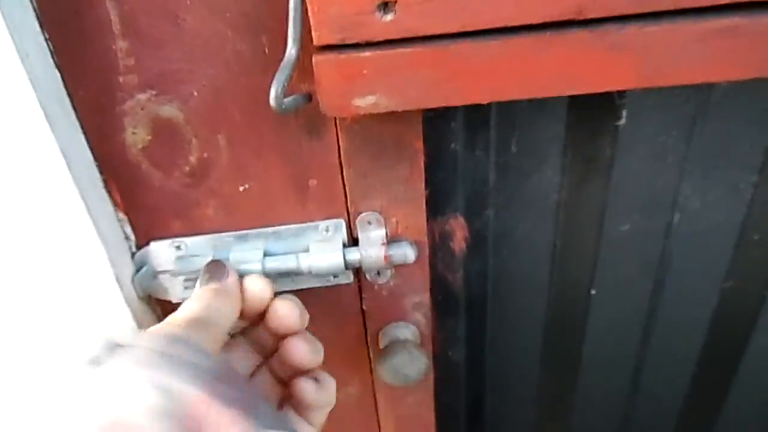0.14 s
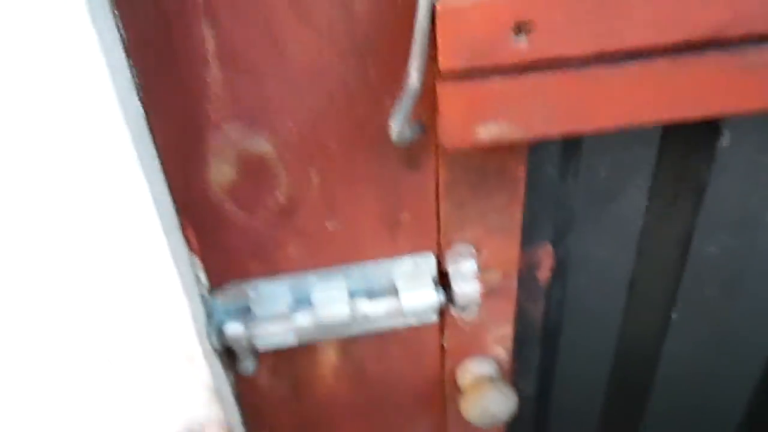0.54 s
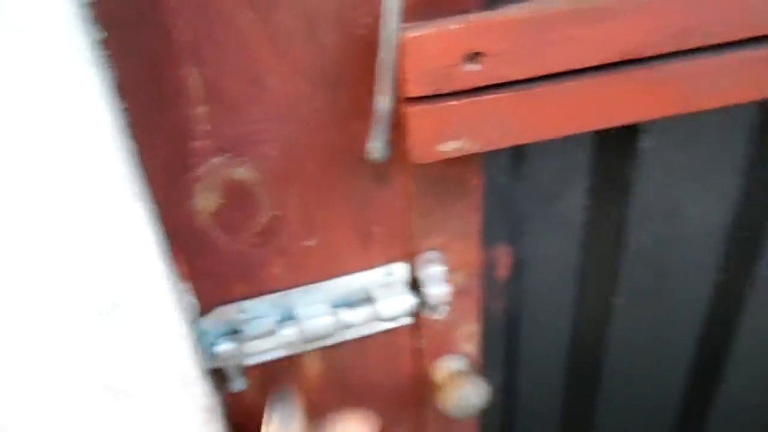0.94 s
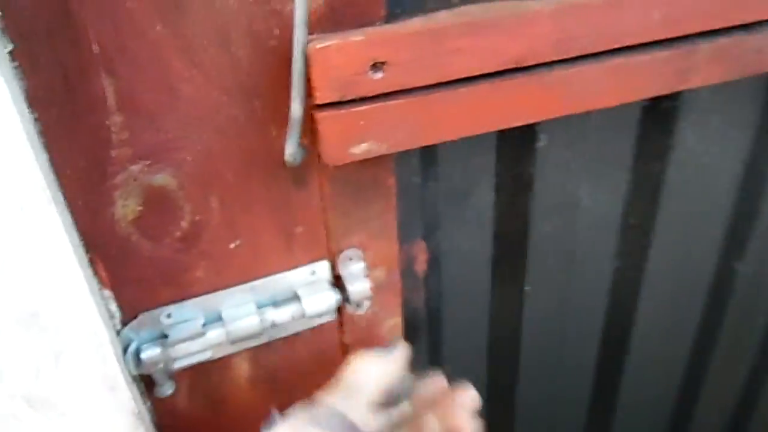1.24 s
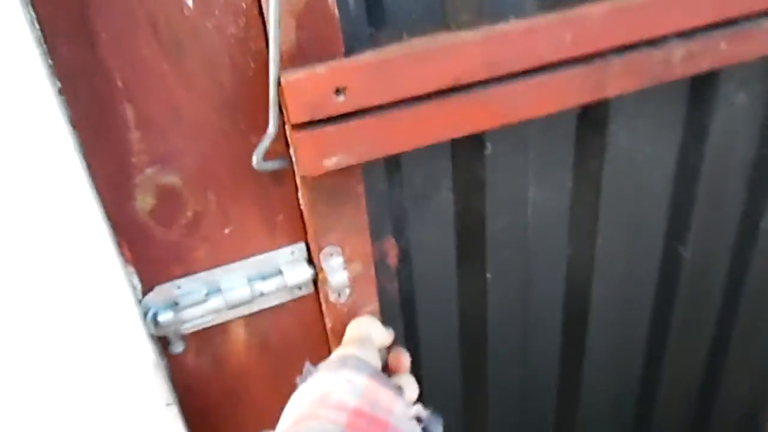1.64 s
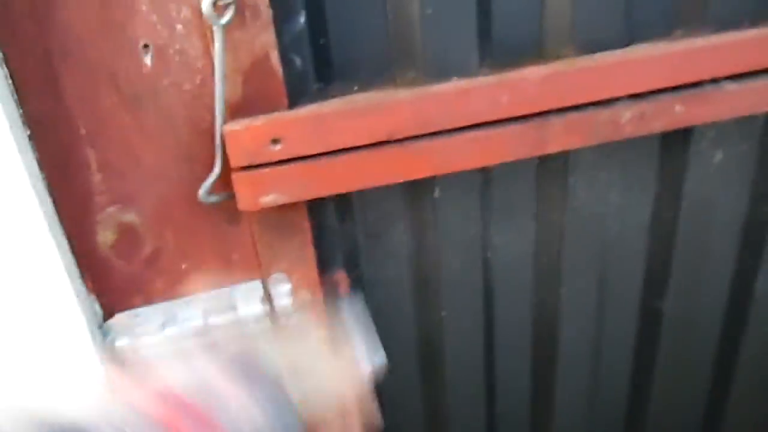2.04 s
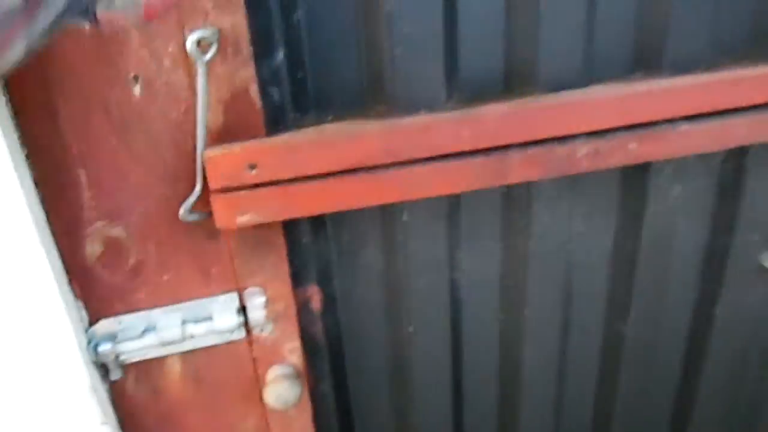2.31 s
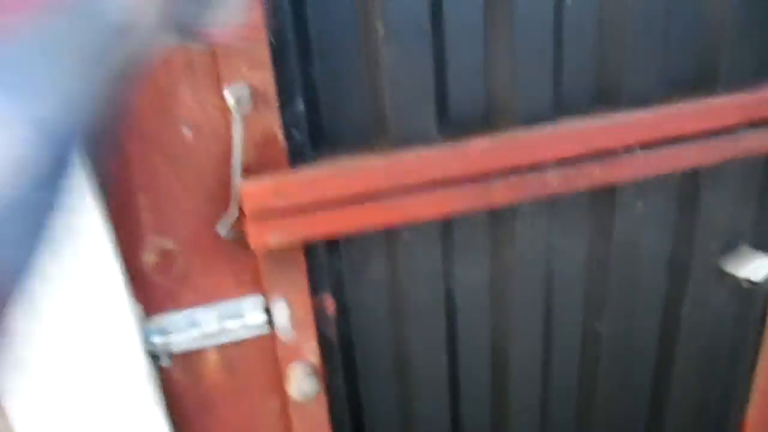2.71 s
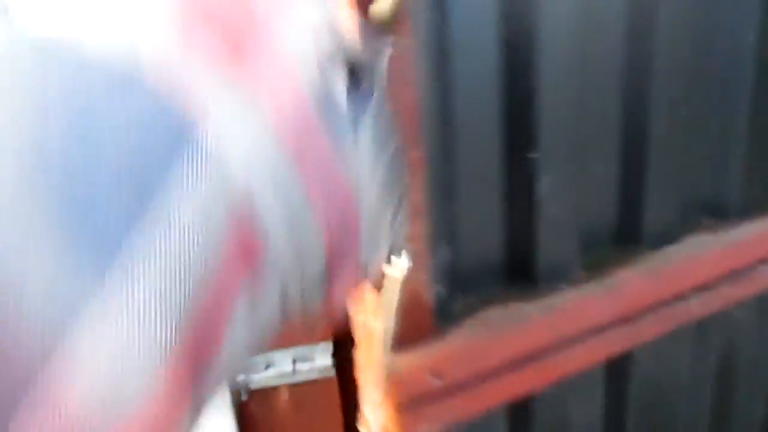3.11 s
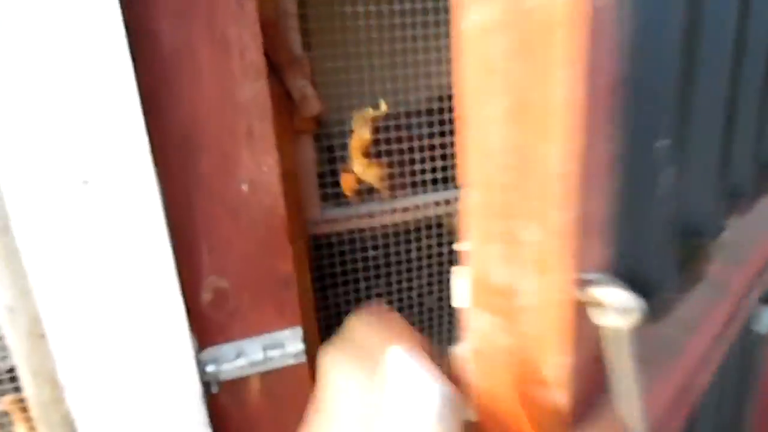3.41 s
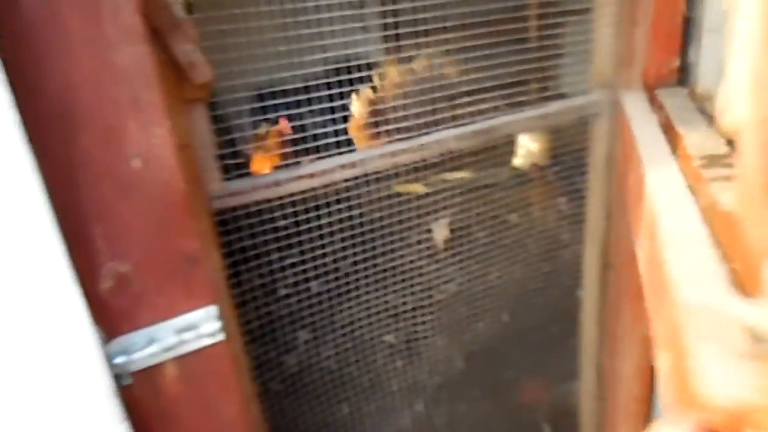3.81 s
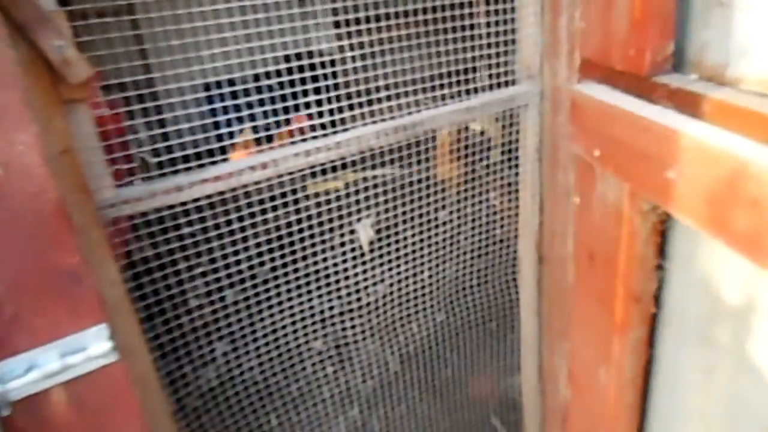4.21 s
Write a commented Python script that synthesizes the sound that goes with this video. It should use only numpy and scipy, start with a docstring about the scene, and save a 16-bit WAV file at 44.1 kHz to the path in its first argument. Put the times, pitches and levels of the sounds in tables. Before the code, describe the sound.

Close outdoor handling: bolt snaps back, sleeve rustles, then a heavy wooden door bangs loose, rattling its hook and sheet metal, knocking as it swings.

```python
"""Outdoor air and handling rumble, filtered noise in slow lumps, lie under a hand-held microphone throughout.
First a steel barrel bolt scrapes back on a wooden coop door, as resonated slip noise, then hits its stop
and its handle drops, as noise bursts through resonances. Sleeve strokes brush past, as grainy noise with snaps.
The stuck door is tugged free with a thump and shudders, as ringing modes; a wire hook rattles and a metal sheet
jangles on it. It knocks lightly as it swings open, while a sliding band of noise whooshes by."""
import sys
import numpy as np
from scipy import signal
from scipy.fft import rfft, irfft
from scipy.io import wavfile
from scipy.ndimage import uniform_filter1d

SR = 44100
rng = np.random.default_rng(int(sys.argv[2]) if len(sys.argv) > 2 else 0)


def master_out(mix):
    """Clip the mix to full scale and print it as 16-bit PCM to the path in sys.argv[1]."""
    frames = np.transpose(np.atleast_2d(mix))
    ceiling = np.clip(frames, -1, 1)
    pcm = np.round(ceiling * 32767).astype(np.int16)
    wavfile.write(sys.argv[1], SR, pcm)


N = 191834
TIME = np.arange(N) / SR  # seconds

# spectrum of the quiet outdoor air: pitch_hz, relative level_db per Hz
AIR_SPECTRUM = [(30, -9.5), (100, -2), (200, -18.5), (350, -11), (850, -24.5), (1180, -11.5), (1600, -32.5),
                (5000, -36.5), (15000, -35.5)]
AIR_DB = -76.5  # rms level
# steady level of the air moving on the microphone, before a small trim: time_s, level_db
DRAUGHT_CURVE = [(0.0, -64.5), (0.67, -57), (1.04, -65.5), (2.13, -44.5), (2.62, -55.5), (2.91, -55),
                 (3.06, -27), (3.12, -28), (3.5, -40.5), (3.73, -38.5), (4.06, -36.5), (4.35, -37.5)]
# single puffs of air as the hands move: peak_s, level_db, release_s
AIR_PUFFS = [(0.0, -46.5, 0.28), (0.5, -30.5, 0.044), (1.17, -48.5, 0.059), (1.36, -41, 0.15),
             (1.57, -44, 0.045), (1.71, -39.5, 0.19), (2.0, -29.5, 0.095), (2.19, -33.5, 0.08),
             (2.31, -28.5, 0.039), (2.925, -17, .07), (3.05, -12.5, 0.067), (3.18, -19.5, 0.15),
             (3.43, -28, 0.041), (3.49, -27, 0.057), (3.84, -34.5, 0.11), (4.09, -21, .06),
             (4.17, -24, .12), (4.32, -29, .06)]
# spectrum of air pushing on the microphone: pitch_hz, relative level_db per Hz
BUFFET_SPECTRUM = [(20, -13), (38, -6.5), (52, 0), (75, -8.5), (110, -15), (170, -28)]
# dull bumps as the grip on the microphone shifts: peak_s, level_db, release_s
GRIP_BUMPS = [(0.0, -40.5, .11), (0.46, -40, 0.14), (1.705, -40, 0.093), (1.47, -57, 0.14), (2.0, -47, .22),
              (2.17, -44, 0.084), (3.035, -23.5, 0.2), (3.43, -38.5, 0.17), (3.91, -42.5, 0.1),
              (4.15, -35.5, 0.25)]
# spectrum of the shifting grip: pitch_hz, relative level_db per Hz
GRIP_SPECTRUM = [(70, -34), (120, 2.5), (200, -10), (330, -7), (480, -21), (700, -16)]
# whoosh rising and falling in pitch on the microphone: time_s, centre_hz, level_db
WHOOSH_CURVE = [(3.98, 98.4, -90), (4.03, 130, -40.5), (4.055, 185.3, -35), (4.085, 330, -53.5),
                (4.12, 270.5, -36), (4.16, 178, -38.5), (4.2, 170, -47), (4.25, 198, -53),
                (4.3, 198.3, -88)]

# steady rubbing of cloth and door edge: time_s, level_db
RUBBING_CURVE = [(0, -74.5), (.36, -74.5), (.6, -59.5), (.8, -74), (1.2, -80.5), (1.45, -72), (1.85, -74),
                 (2.12, -52), (2.8, -58.5), (3.03, -35.5), (3.38, -49.5), (3.72, -42.5), (3.86, -54),
                 (4.35, -50)]
# single scuffs of hand and sleeve: peak_s, level_db, release_s
SCUFF_GESTURES = [(0.0, -51, 0.089), (0.54, -57, 0.081), (0.68, -54.5, 0.078), (1.32, -66, 0.12),
                  (1.455, -58, 0.064), (1.94, -43.5, 0.057), (2.915, -35, 0.11), (3.65, -45, 0.26)]
# spectrum of the rubbing: pitch_hz, relative level_db per Hz
RUB_SPECTRUM = [(250, -11), (450, -1), (750, -1.5), (1250, -3.5), (2000, -16), (3200, -19), (6000, -34)]
# level of the cloth's treble hiss: time_s, level_db
RUSTLE_CURVE = [(0, -59.5), (.12, -69.5), (.35, -72.5), (.6, -67), (.76, -73), (1.1, -86), (1.3, -78),
                (1.6, -69), (1.85, -69), (2.02, -59.5), (2.14, -52.5), (2.8, -63.5), (3.0, -54.5),
                (3.3, -64), (3.41, -65), (3.6, -64), (4.13, -52.5), (4.35, -54)]
# spectrum of that hiss: pitch_hz, relative level_db per Hz
HISS_SPECTRUM = [(1200, 5.5), (2500, 1.5), (4000, 0), (7000, 0), (11000, -2), (13000, -4), (16000, -6.5)]
# strokes of the sleeve: start_s, peak_s, end_s, level_db
SLEEVE_STROKES = [(1.657, 1.758, 1.856, -45), (1.909, 1.944, 2, -36), (2.839, 2.9, 2.92, -29.5),
                  (4.104, 4.138, 4.22, -45)]
STROKE_START_DB, STROKE_STOP_DB = -18.5, -11.5  # relative to its peak, where a stroke sets in and breaks off
# spectrum of the sleeve: pitch_hz, relative level_db per Hz
SLEEVE_SPECTRUM = [(300, -4), (900, 6), (1600, -3.5), (3200, 3.5), (5000, 0), (9500, 0.5), (13000, -3),
                   (16000, -10.5)]
# threads of the sleeve snagging: start_s, peak_db
THREAD_SNAGS = [(1.9394, -19), (1.95, -32), (1.9565, -31), (1.9655, -22), (1.9784, -29)]
ATTACK_SHARE = 0.62  # attack of a puff, bump or scuff as a share of its release
SWELL_DB = 21  # fall over one attack or release time

# ranges of thud, knock, clack and tick: low_hz, high_hz
BLOW_REGISTERS = [(140, 432), (450, 1324), (1400, 4780), (4800, 11760)]
PIVOT_HZ = 1380  # brightness tilts a blow about this pitch
FOCUS_DB, FOCUS_OCTAVES = 6.5, 1.06  # lift of the register around the main ring, and its reach

# hook tapping on the door:
# start_s, main_ring_hz, level_db, brightness_db_per_octave, t60_s near 1 kHz, wire_ring_db
HOOK_TAPS = [(1.019, 3430, -65.5, -1.5, 0.1, -79), (1.071, 2920, -63, -0.5, 0.056, -74),
             (3.0315, 3150, -33, 1, 0.045, -51), (3.0886, 3280, -33.5, -1, .045, -41.5),
             (3.109, 3180, -35.5, 1.2, 0.096, -43), (3.1341, 1980, -37.5, 0, 0.0098, -44),
             (3.1613, 3370, -31, -1.5, 0.046, -43), (3.1904, 3050, -39.5, 0, .022, -44.5),
             (3.2408, 815, -29, -0.5, 0.031, -40.5), (3.258, 1340, -36, -0.5, 0.036, -47.5)]
# register balance of a hook tap before focus and brightness: thud_db, knock_db, clack_db, tick_db
HOOK_BALANCE = (-3, -5.5, -5.5, -5)
# free ringing of the wire hook, mostly in close pairs: pitch_hz, relative level_db, t60_s
WIRE_MODES = [(6724, -7, .22), (7004, -6, .24), (10960, -6, .24), (11370, -6, .22), (14140, -16, .3)]
# resonances of the metal sheet: pitch_hz, width_hz, relative level_db
SHEET_RESONANCES = [(1440, 19, 2.5), (1520, 31, -10), (1670, 53, -6), (2006, 32, 1), (2064, 41, 2),
                    (2540, 42, -18), (3020, 65, -3.5), (3700, 83, -13), (3750, 32, -4), (4400, 95, -16)]
# the metal sheet buzzes against its frame while the door shudders
JANGLE_START_S, JANGLE_STOP_S, JANGLE_DB = 3.04, 3.295, -42.5
JANGLE_RISE_DB_PER_S, JANGLE_FALL_DB_PER_S = 2400, 520

# wood against wood, hand on knob:
# start_s, main_ring_hz, level_db, brightness_db_per_octave, t60_s near 1 kHz
WOOD_KNOCKS = [(1.692, 890, -43.5, -0.5, 0.11), (1.702, 890, -51, -1, 0.21), (2.073, 3330, -48, -4, 0.038),
               (2.093, 2340, -45, 1, 0.023), (2.247, 1220, -52, 0.5, 0.011), (2.443, 696, -46.5, -2, 0.11),
               (2.838, 954, -43.5, -1.5, .028), (2.9053, 777, -20, 3.5, 0.06),
               (2.914, 829, -23.5, -2.3, 0.031), (2.943, 2340, -35.5, 3, 0.023),
               (2.978, 543, -42.5, 1.5, 0.082), (3.009, 1060, -28.5, 1, 0.049), (3.039, 686, -30, 0, 0.064),
               (3.22, 790, -30, 0.5, 0.25), (3.311, 611, -34.5, -1.5, .045),
               (3.4048, 795, -33.5, -1.9, 0.034), (3.417, 897, -35.5, 0.4, 0.081),
               (3.4854, 740, -36, -1.2, 0.049), (3.533, 1370, -47, -3.3, 0.074),
               (3.5815, 805, -36.5, -2, 0.067), (3.626, 526, -41.5, -4, 0.086),
               (3.6555, 496, -33, 1, 0.043), (3.708, 1490, -44.5, 4.5, 0.047),
               (3.743, 708, -37.5, -3.5, 0.06), (3.9014, 591, -39.5, -0.7, 0.081),
               (3.929, 2360, -45.5, 1.3, 0.14), (4.1395, 517, -41.5, 3.5, 0.14)]
# resonances of the wooden door: pitch_hz, width_hz, relative level_db
DOOR_RESONANCES = [(191, 78, -7.5), (284, 39, -1), (337, 24, -1), (640, 78, 1), (782, 166, -1),
                   (1196, 53, -4), (1490, 380, -11), (1840, 430, -0.5), (2490, 300, -7), (4930, 490, -64),
                   (7560, 980, -5)]
# jolts that shake the whole door: start_s, level_db
DOOR_JOLTS = [(0.501, -37.5), (0.988, -55.5), (2.904, -15.5), (3.019, -18.5), (3.037, -10), (3.159, -27),
              (3.239, -25)]
# bending modes of the door: pitch_hz, relative level_db, t60_s
PANEL_MODES = [(51.5, -3.5, 0.094), (72.7, -7, 0.78), (98, -3, .22), (150.7, -9, 0.32), (207.7, -17, 0.43),
               (330, -9, .25), (418, -32.5, 0.16)]
# heavier balance of the door held in its frame: thud_db, knock_db, clack_db, tick_db
SHUT_BALANCE = (-2.5, -5, -6, -15.5)
# lighter balance of the door swinging free: thud_db, knock_db, clack_db, tick_db
FREE_BALANCE = (-7.5, -5, -5, -15)
FREE_S = 3.1  # the door leaves its frame

# bolt sliding in its barrel: time_s, friction_db
SLIDE_CURVE = [(0.33, -100), (0.375, -62.5), (0.395, -45), (0.44, -39.5), (0.475, -39.5), (0.502, -32),
               (0.52, -53), (0.54, -100)]
# steel on steel: pitch_hz, width_hz, relative level_db
BARREL_RESONANCES = [(310, 240, -4), (566, 120, 1.5), (937, 110, 1), (1220, 150, -4.5), (1710, 220, -13),
                     (3450, 750, -17.5), (8400, 7200, -32.5)]
# bolt hits its stop, its handle drops and settles:
# start_s, main_ring_hz, level_db, brightness_db_per_octave, t60_s near 1 kHz
BOLT_BLOWS = [(0.504, 860, -26.5, 1.93, 0.03), (0.657, 940, -49, -0.8, 0.064),
              (0.705, 2470, -53, -0.7, 0.056), (0.989, 228, -55.5, -0.2, 0.02)]
# resonances of the bolt on its board: pitch_hz, width_hz, relative level_db
BOLT_RESONANCES = [(336, 25, -7), (540, 46, -1), (860, 210, -3), (1150, 120, 3), (1760, 170, -3.5),
                   (2154, 230, -1), (2880, 280, -7), (3840, 250, -6.5), (6600, 230, -2.5),
                   (10300, 2300, -4.5)]
# register balance of a bolt blow before focus and brightness: thud_db, knock_db, clack_db, tick_db
BOLT_BALANCE = (-1.5, -7, -4, -8.5)

CUTOFF_HZ = 16000  # the treble is cut above this


def from_db(db):
    """Decibels to gain."""
    return 10 ** (np.asarray(db) / 20)


def rms_one(x):
    """Scale to unit rms."""
    return x / np.sqrt(np.mean(x ** 2) + 1e-20)


def in_time(rows):
    """Each column of a curve at every sample."""
    s, *columns = np.transpose(rows)
    return [np.interp(TIME, s, column) for column in columns]


def coloured(x, spectrum):
    """Give a steady excitation a spectrum that falls 20 dB per octave beyond its ends; rms 1."""
    hz, db = np.transpose(spectrum)
    octave = np.log2(np.maximum(np.fft.rfftfreq(N, 1 / SR), 1))
    known = np.log2(hz)
    beyond = np.abs(octave - np.clip(octave, known[0], known[-1]))
    gain = from_db(np.interp(octave, known, db) - 20 * beyond)
    return rms_one(irfft(rfft(x) * gain, N))


def drift(rate):
    """Smooth chance: lines between random points, rate of them per second; the last holds once they run out."""
    knots = rng.standard_normal(N // 20)
    return np.interp(TIME * rate, np.arange(len(knots)), knots)


def grains(spread_db, clump_db, clump_rate):
    """Tiny slips of uneven size that come in clumps."""
    slips = rng.standard_normal(N)
    size_db = spread_db * np.clip(drift(5000), -2.5, 2.5)
    return slips * from_db(size_db + clump_db * drift(clump_rate))


def lumps(spectrum):
    """Low lumpy noise with its slow level evened out."""
    x = coloured(rng.standard_normal(N), spectrum)
    return x / np.sqrt(uniform_filter1d(x ** 2, size=3000) + 1e-9)


def swells(rows):
    """Gain of separate gestures that each rise to a peak and die away."""
    power = 0
    for peak_s, db, release_s in rows:
        away = np.maximum((peak_s - TIME) / ATTACK_SHARE, TIME - peak_s) / release_s
        power = power + from_db(db - SWELL_DB * np.minimum(away, 10)) ** 2
    return np.sqrt(power)


def resonate(x, peaks):
    """Parallel two-pole resonances of alternating sign."""
    out = 0
    for k, (hz, width, db) in enumerate(peaks):
        r = np.exp(-np.pi * width / SR)
        feed = [(1 - r * r) / 2, 0, (r * r - 1) / 2]
        feedback = [1, -2 * r * np.cos(2 * np.pi * hz / SR), r * r]
        out = out + (-1) ** k * from_db(db) * signal.lfilter(feed, feedback, x)
    return out


def ring(times, levels_db, modes, uneven_db):
    """Each blow sets every decaying sine mode ringing with a strength of its own."""
    out = np.zeros(N)
    at = np.round(np.asarray(times) * SR).astype(int)
    for hz, db, t60 in modes:
        clicks = np.full(N, 1e-18)
        clicks[at] = from_db(levels_db + db + uneven_db * rng.standard_normal(len(at)))
        r = np.exp(-np.log(1000) / (t60 * SR))
        w = 2 * np.pi * hz / SR
        out += signal.lfilter([0, np.sin(w)], [1, -2 * r * np.cos(w), r * r], clicks)
    return out


def blows(hits, body, voice_db, plain_db, main_db, main_q, push_db, rise_s, damping,
          crack_db, crack_t60, tail_db, tail_t60):
    """Each blow pushes the body and wakes a crowd of close modes: a crack, a ring, a faint tail off the walls."""
    out, t = np.zeros(N + SR), TIME[:SR // 3]
    attack = SR // 55
    fall = -np.log(1000) * t
    push = from_db(push_db) * (t == 0)
    centres = np.sqrt(np.prod(BLOW_REGISTERS, axis=1))
    for s, main_hz, level_db, brightness, t60, *_ in hits:
        # dense modes sound as noise with a soft onset
        crowd = rng.standard_normal(len(t)) * (1 - np.exp(-t / rise_s))
        # the place of contact favours one resonance and weights the others anew
        peaks = [(hz, width, db + 2 * rng.standard_normal()) for hz, width, db in body]
        peaks.append((main_hz, main_hz / main_q, main_db))
        focus_db = FOCUS_DB * np.exp(-(np.log2(centres / main_hz) / FOCUS_OCTAVES) ** 2)
        # a harder contact tilts the blow towards the treble
        tilt_db = brightness * np.log2(centres / PIVOT_HZ)
        levels_db = level_db + np.array(voice_db) + focus_db + tilt_db
        for (low, high), db in zip(BLOW_REGISTERS, levels_db):
            # ring and tail die sooner in the treble
            life = (np.sqrt(low * high) / 1000) ** -damping
            body_ring = np.exp(fall / (t60 * life))
            crack = from_db(crack_db) * np.exp(fall / crack_t60)
            tail = from_db(tail_db) * np.exp(fall / (tail_t60 * life))
            burst = crowd * (body_ring + crack + tail)
            band = signal.butter(3, [low, min(high, .45 * SR)], "band", fs=SR, output="sos")
            sound = signal.sosfilt(band, resonate(burst + push, peaks) + from_db(plain_db) * burst)
            at = round(s * SR)
            # the level is set on the first 18 ms
            out[at:at + len(t)] += from_db(db) * sound / np.std(sound[:attack])
    return out[:N]


def rumble(draught_db=0.5, grip_db=-0.5):
    """Air and fingers push on the microphone in slow lumps, over the quiet yard; the grip creeps as the arm rubs."""
    moving_db, = in_time(DRAUGHT_CURVE)
    rubbing_db, = in_time(RUBBING_CURVE)
    yard = from_db(AIR_DB) * coloured(rng.standard_normal(N), AIR_SPECTRUM)
    # steady and gestured levels add as powers
    air = np.hypot(from_db(moving_db + draught_db), swells(AIR_PUFFS)) * lumps(BUFFET_SPECTRUM)
    grip = np.hypot(from_db(rubbing_db + grip_db), swells(GRIP_BUMPS)) * lumps(GRIP_SPECTRUM)
    return yard + air + grip


def whoosh(drift_rate=55):
    """A narrow band of turbulence, random drift on a carrier, whose centre slides."""
    hz, db = in_time(WHOOSH_CURVE)
    phase = 2 * np.pi * np.cumsum(hz) / SR
    band = drift(drift_rate) * np.cos(phase) + drift(drift_rate) * np.sin(phase)
    return from_db(db) * rms_one(band)


def clothes(scuff_hiss_db=-14):
    """Cloth rubs softly all along, with a few scuffs; each sleeve stroke swells and stops in a zip of thread slips."""
    rubbing_db, = in_time(RUBBING_CURVE)
    rustle_db, = in_time(RUSTLE_CURVE)
    scuffs = swells(SCUFF_GESTURES)
    slips = grains(spread_db=7, clump_db=3.5, clump_rate=100)
    rub = np.hypot(from_db(rubbing_db), scuffs) * coloured(slips, RUB_SPECTRUM)
    fibres = grains(spread_db=3.0, clump_db=2.0, clump_rate=270)
    hiss_gain = np.hypot(from_db(rustle_db), from_db(scuff_hiss_db) * scuffs)
    hiss = hiss_gain * coloured(fibres, HISS_SPECTRUM)
    stroke = np.zeros(N)
    for start, peak, end, db in SLEEVE_STROKES:
        shape_db = np.interp(TIME, [start, peak, end], [STROKE_START_DB, 0, STROKE_STOP_DB])
        stroke += from_db(db + shape_db) * (TIME > start) * (TIME < end)
    threads = grains(spread_db=4.5, clump_db=3, clump_rate=300)
    return rub + hiss + stroke * coloured(threads, SLEEVE_SPECTRUM)


def snags(snag_t60=0.0028, low_hz=2200):
    """A caught thread lets go with a tiny snap: a bright, fast-dying noise burst."""
    out, t = np.zeros(N), TIME[:SR // 100]
    treble = signal.butter(1, low_hz, "high", fs=SR, output="sos")
    for s, db in THREAD_SNAGS:
        burst = rng.standard_normal(len(t)) * np.exp(-np.log(1000) * t / snag_t60)
        snap = signal.sosfilt(treble, burst)
        at = round(s * SR)
        out[at:at + len(t)] += from_db(db) * snap / np.abs(snap).max()
    return out


def hook(waver_db=2.5):
    """The hook bounces on the door and its wire rings; the sheet jangles while the door shudders."""
    s, *_, ring_db = np.transpose(HOOK_TAPS)
    taps = blows(HOOK_TAPS, DOOR_RESONANCES, HOOK_BALANCE, plain_db=-9.5, main_db=8, main_q=20,
                 push_db=14, rise_s=0.00048, damping=0.12, crack_db=12, crack_t60=0.0045,
                 tail_db=-23, tail_t60=0.21)
    # each mode of the wire wavers as the hook turns
    wire = sum(ring(s, ring_db, [mode], uneven_db=4.5) * from_db(waver_db * drift(37.0))
               for mode in WIRE_MODES)
    rise_db = JANGLE_RISE_DB_PER_S * np.clip(JANGLE_START_S - TIME, 0, 1)
    fall_db = JANGLE_FALL_DB_PER_S * np.clip(TIME - JANGLE_STOP_S, 0, 1)
    buzz = resonate(grains(spread_db=7.5, clump_db=1.0, clump_rate=62), SHEET_RESONANCES)
    jangle = from_db(JANGLE_DB - rise_db - fall_db) * rms_one(buzz)
    return taps + wire + jangle


def door(sheet_db=-17):
    """The door drags from its frame in knocks that ring on in its metal sheet; big jolts shudder the whole panel."""
    jolt_s, jolt_db = np.transpose(DOOR_JOLTS)
    knock_s, _, knock_db, *_ = np.transpose(WOOD_KNOCKS)
    shut = [hit for hit in WOOD_KNOCKS if hit[0] < FREE_S]
    free = [hit for hit in WOOD_KNOCKS if hit[0] >= FREE_S]
    knocks = sum(blows(hits, DOOR_RESONANCES, voice, plain_db=-7.0, main_db=6, main_q=18,
                       push_db=22.0, rise_s=0.00028, damping=0.2, crack_db=5.5, crack_t60=0.0059,
                       tail_db=-18.5, tail_t60=0.26)
                 for hits, voice in ((shut, SHUT_BALANCE), (free, FREE_BALANCE)))
    shudder = ring(jolt_s, jolt_db, PANEL_MODES, uneven_db=3.0)
    # a resonance's width sets its ringing time
    sheet_modes = [(hz, mode_db + sheet_db, np.log(1000) / (np.pi * width))
                   for hz, width, mode_db in SHEET_RESONANCES]
    sheet = ring(knock_s, knock_db, sheet_modes, uneven_db=0)
    return knocks + shudder + sheet


def bolt():
    """The bolt scrapes along its barrel in resonated slips, slams into the stop, and its handle drops."""
    friction_db, = in_time(SLIDE_CURVE)
    slips = grains(spread_db=5.5, clump_db=2.5, clump_rate=160)
    scrape = from_db(friction_db) * rms_one(resonate(slips, BARREL_RESONANCES))
    impacts = blows(BOLT_BLOWS, BOLT_RESONANCES, BOLT_BALANCE, plain_db=-10, main_db=-6.0, main_q=11,
                    push_db=14.5, rise_s=0.00027, damping=0.14, crack_db=3.5, crack_t60=0.0026,
                    tail_db=-32, tail_t60=.17)
    return scrape + impacts


def scene():
    """All sources at the microphone."""
    return (bolt() + door() + hook() + clothes() + snags() + rumble() + whoosh())[None]


def record(dry, top=0.49, split_hz=180, low_cut_hz=29):
    """The deepest bass is dropped, loud blows overload above the bass, the top is cut."""
    x = signal.sosfilt(signal.butter(2, low_cut_hz, "high", fs=SR, output="sos"), dry)
    bass = signal.sosfiltfilt(signal.butter(2, split_hz, fs=SR, output="sos"), x)
    x = bass + top * np.tanh((x - bass) / top)
    return signal.sosfilt(signal.ellip(10, .1, 80, CUTOFF_HZ, fs=SR, output="sos"), x)


dry = scene()
out = record(dry)
master_out(out)
```